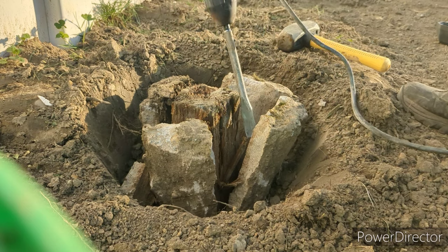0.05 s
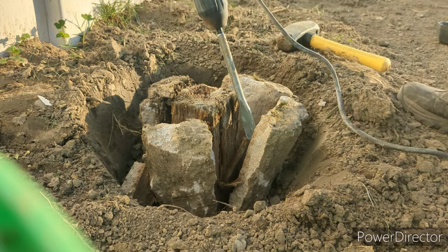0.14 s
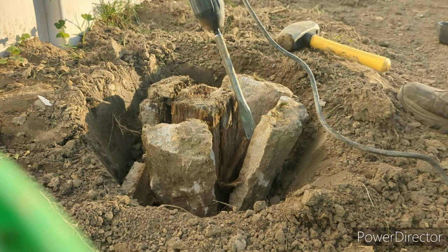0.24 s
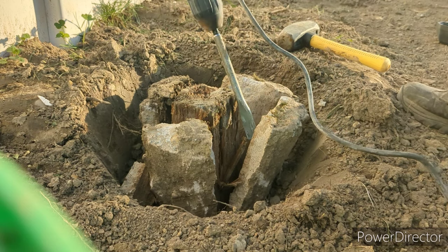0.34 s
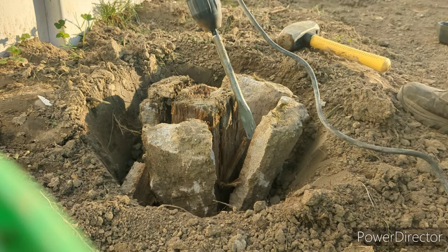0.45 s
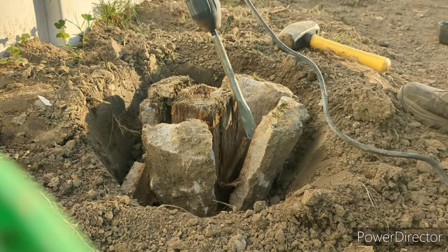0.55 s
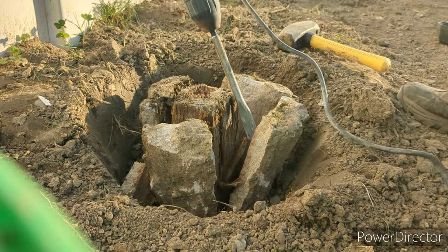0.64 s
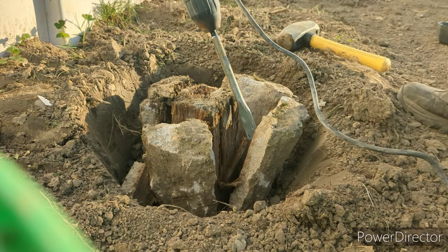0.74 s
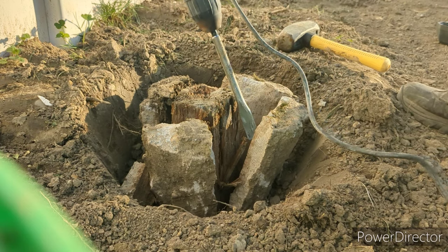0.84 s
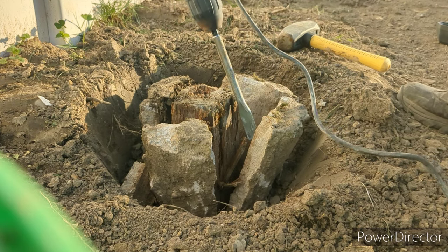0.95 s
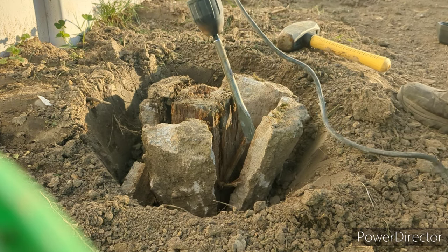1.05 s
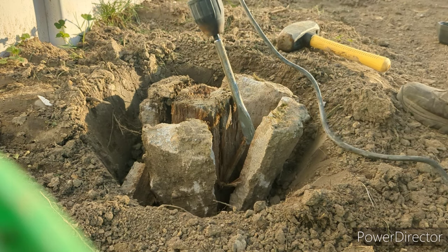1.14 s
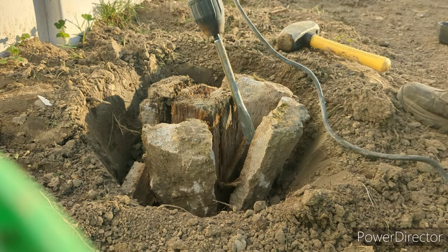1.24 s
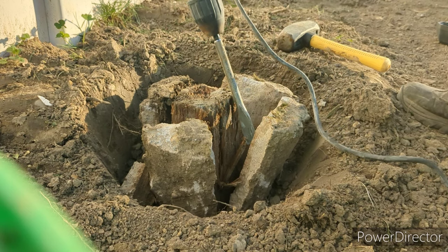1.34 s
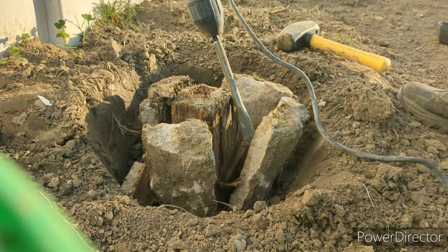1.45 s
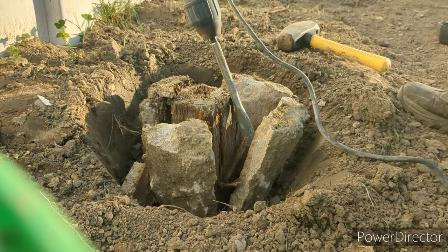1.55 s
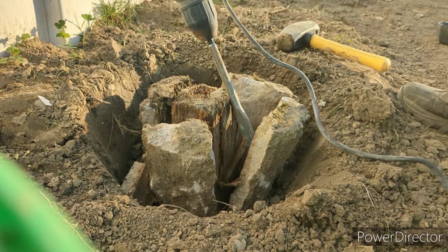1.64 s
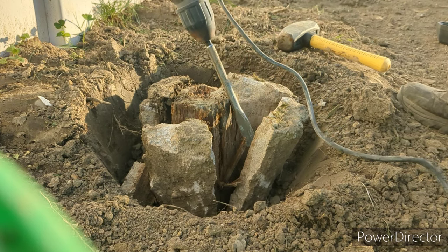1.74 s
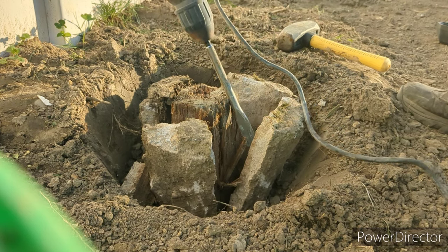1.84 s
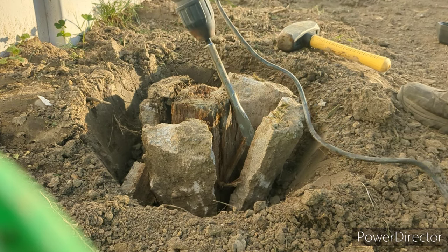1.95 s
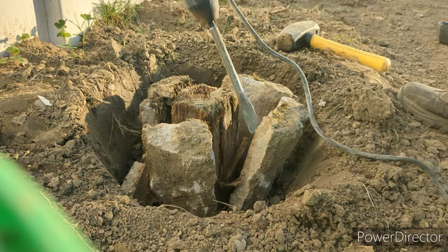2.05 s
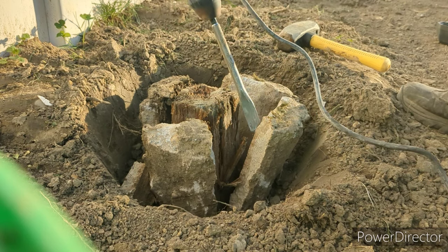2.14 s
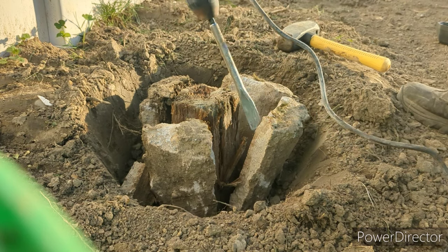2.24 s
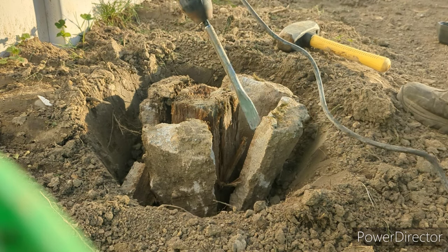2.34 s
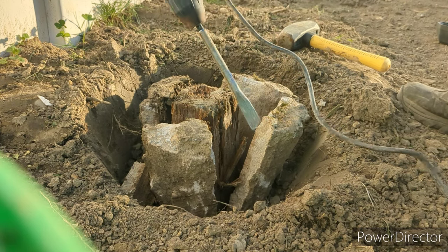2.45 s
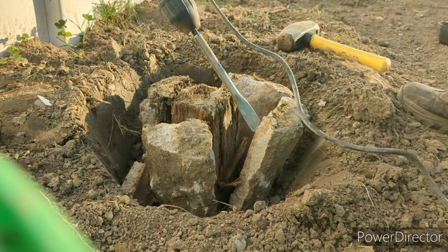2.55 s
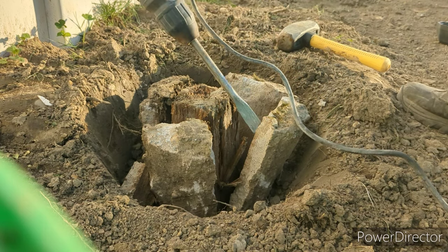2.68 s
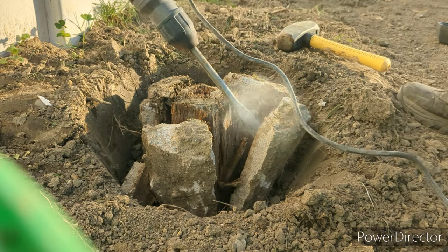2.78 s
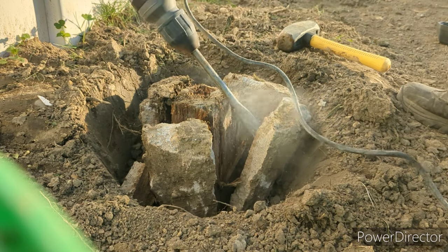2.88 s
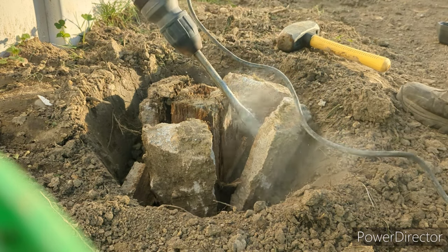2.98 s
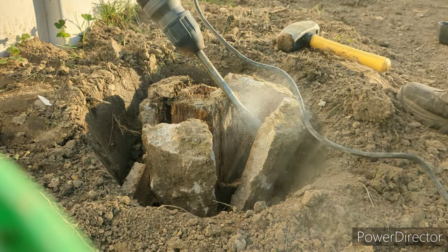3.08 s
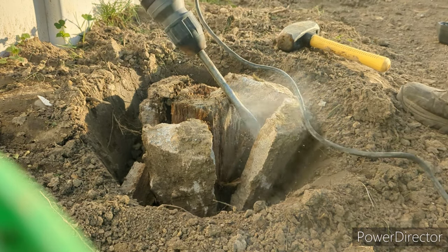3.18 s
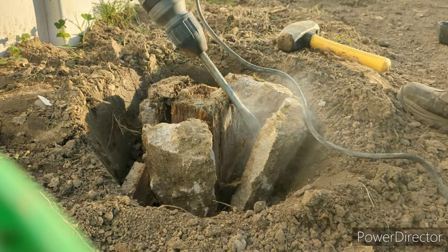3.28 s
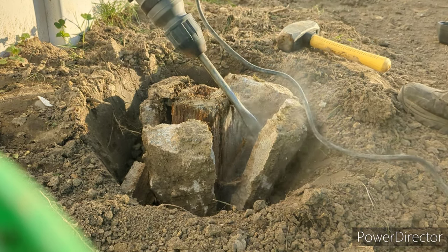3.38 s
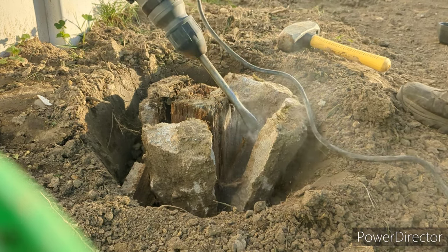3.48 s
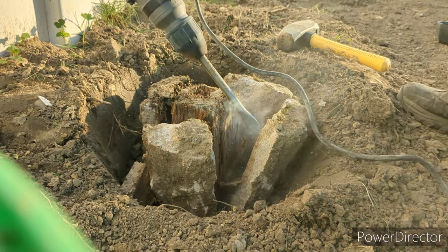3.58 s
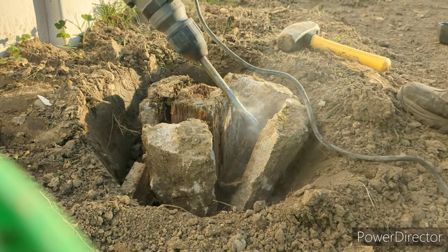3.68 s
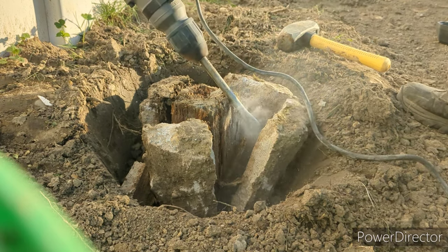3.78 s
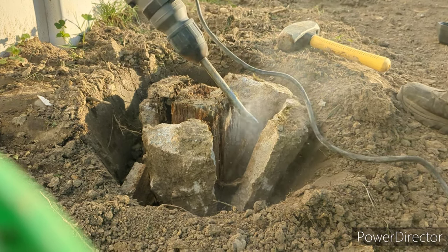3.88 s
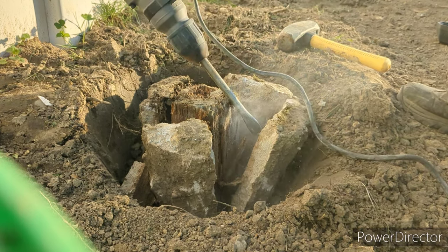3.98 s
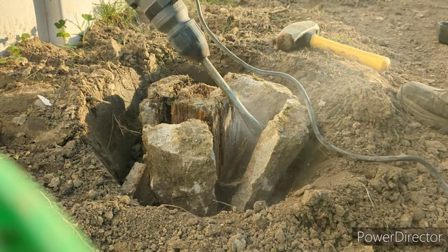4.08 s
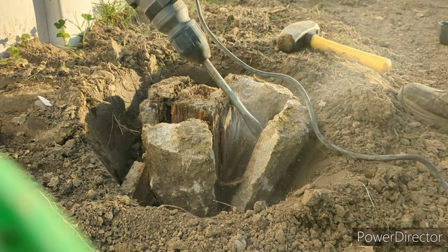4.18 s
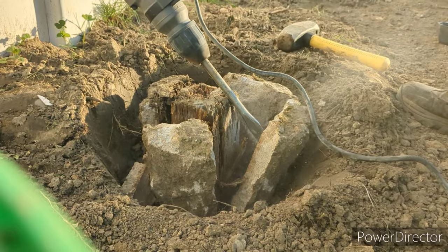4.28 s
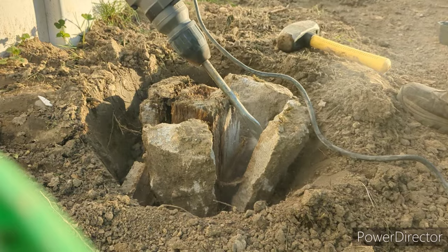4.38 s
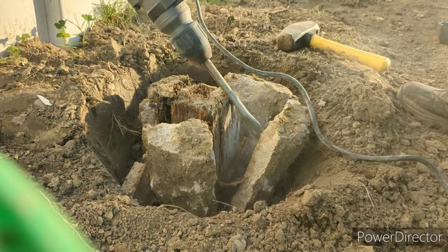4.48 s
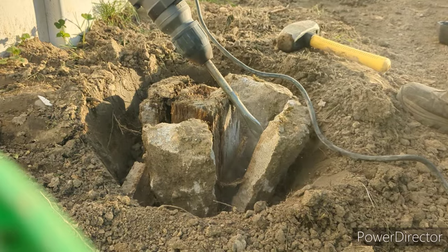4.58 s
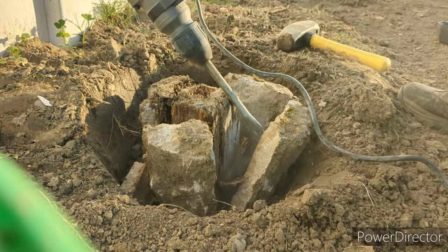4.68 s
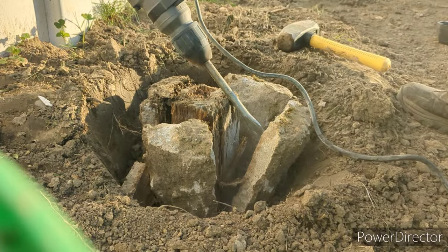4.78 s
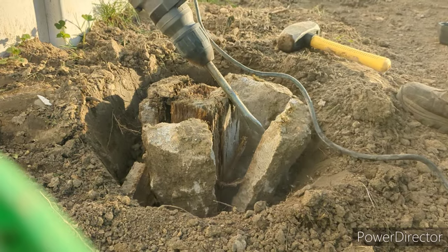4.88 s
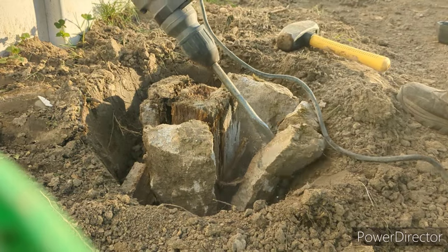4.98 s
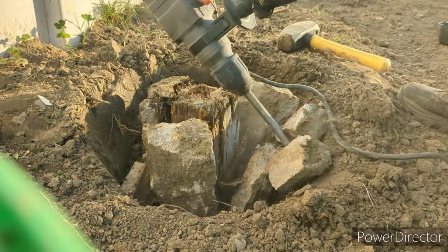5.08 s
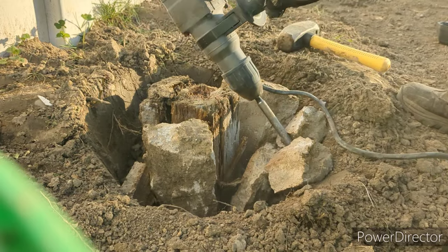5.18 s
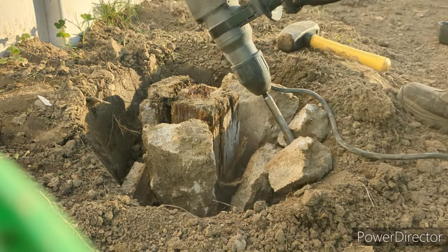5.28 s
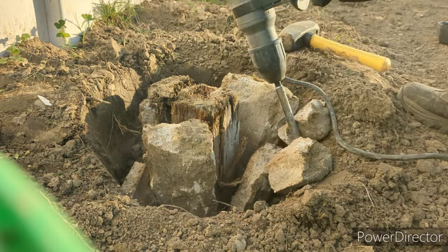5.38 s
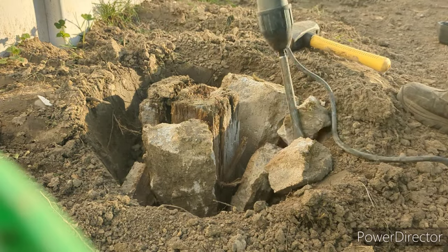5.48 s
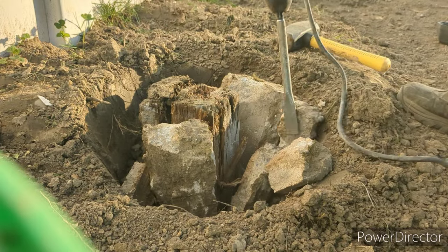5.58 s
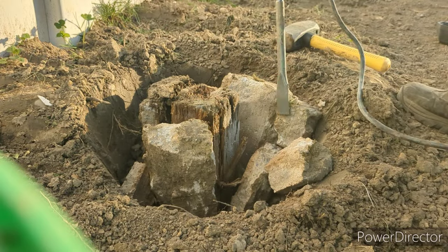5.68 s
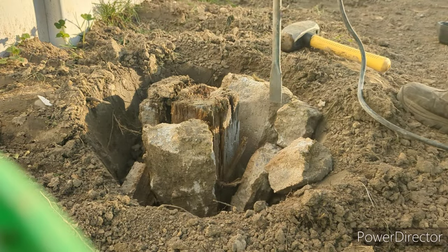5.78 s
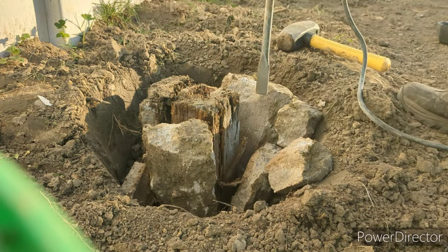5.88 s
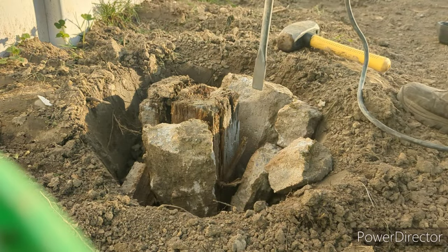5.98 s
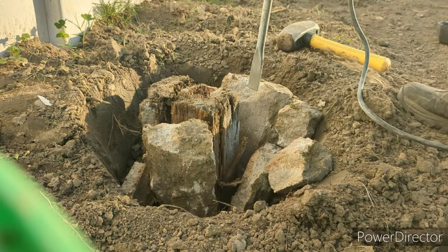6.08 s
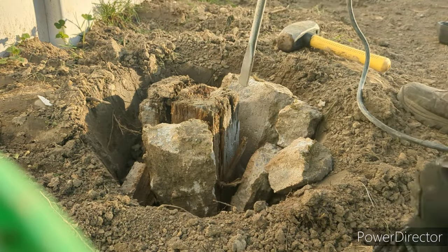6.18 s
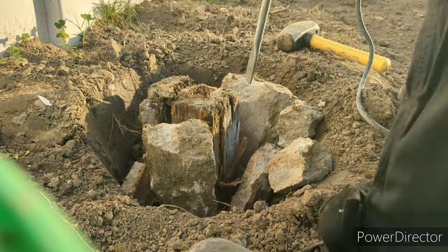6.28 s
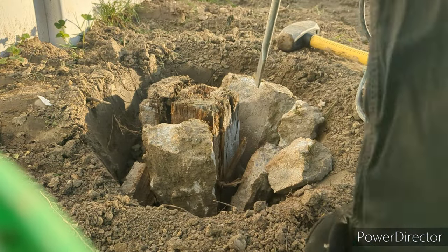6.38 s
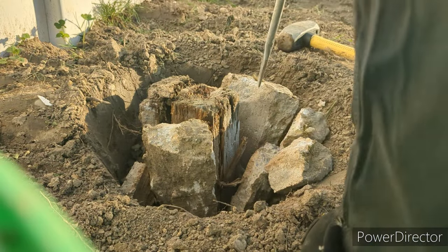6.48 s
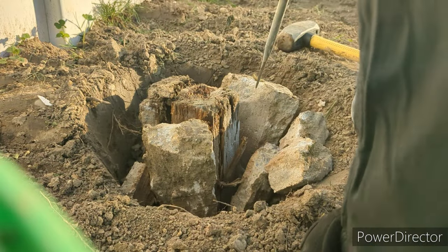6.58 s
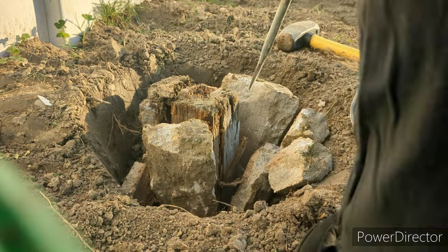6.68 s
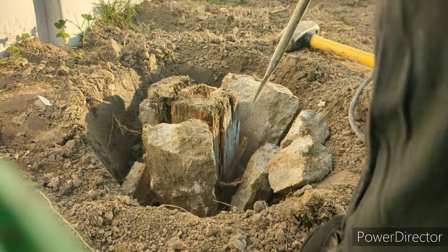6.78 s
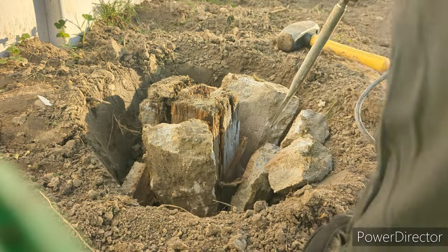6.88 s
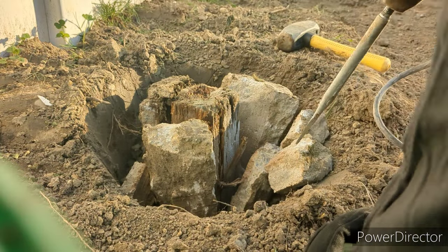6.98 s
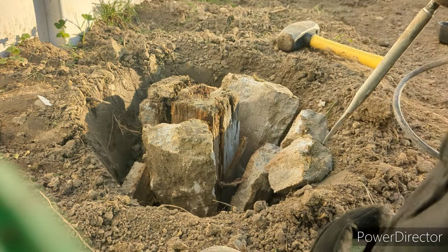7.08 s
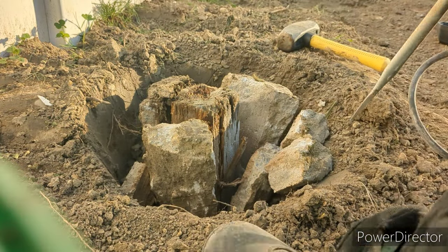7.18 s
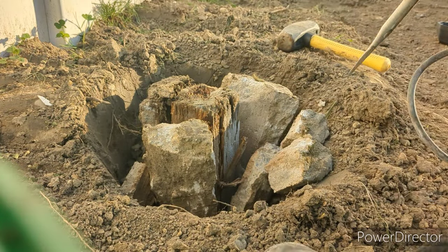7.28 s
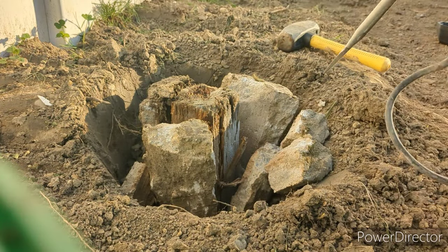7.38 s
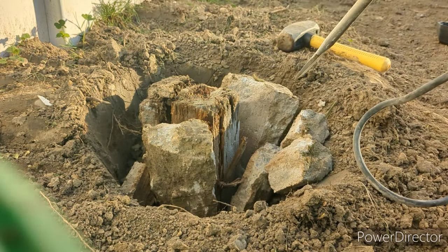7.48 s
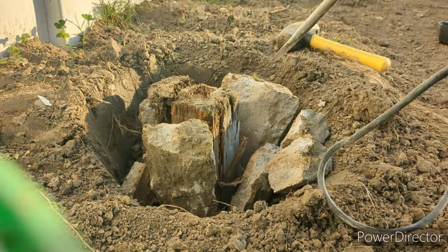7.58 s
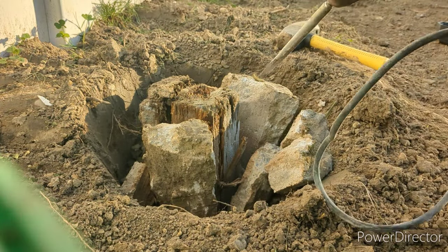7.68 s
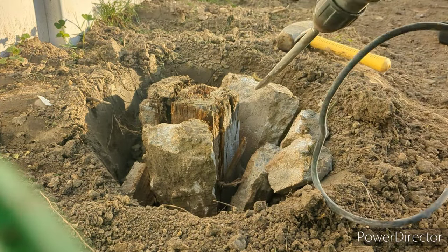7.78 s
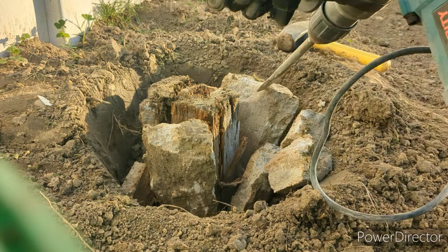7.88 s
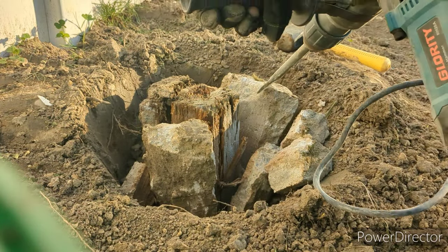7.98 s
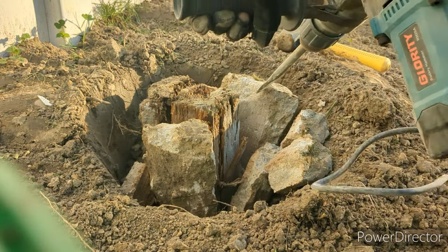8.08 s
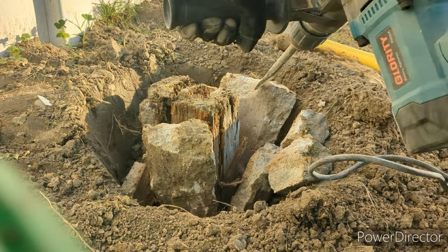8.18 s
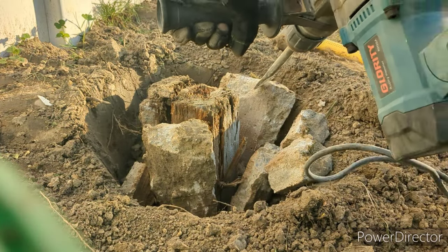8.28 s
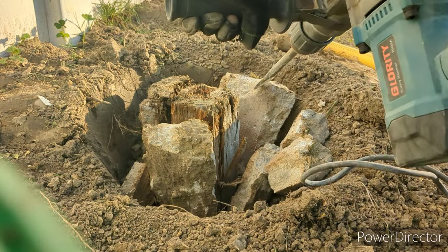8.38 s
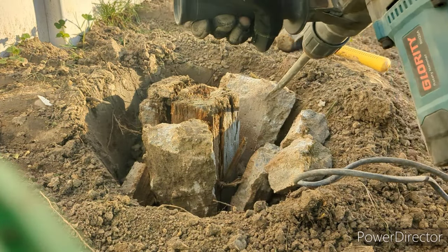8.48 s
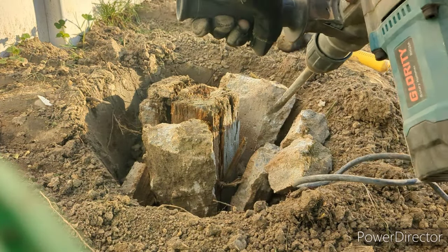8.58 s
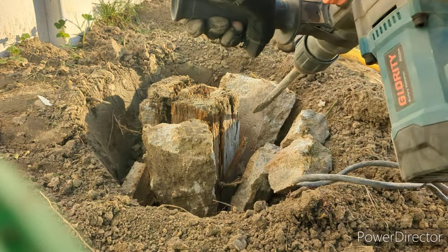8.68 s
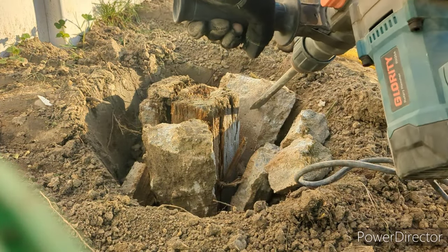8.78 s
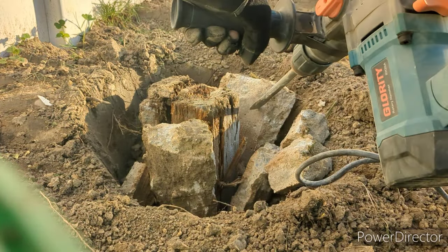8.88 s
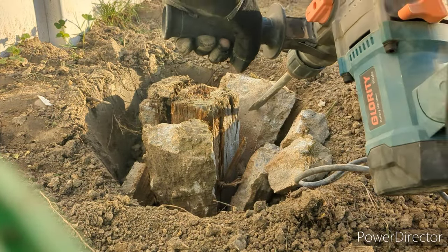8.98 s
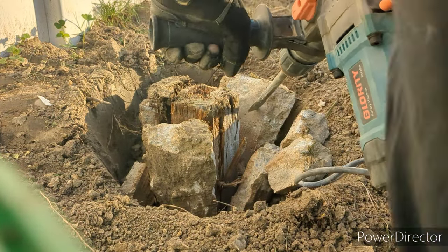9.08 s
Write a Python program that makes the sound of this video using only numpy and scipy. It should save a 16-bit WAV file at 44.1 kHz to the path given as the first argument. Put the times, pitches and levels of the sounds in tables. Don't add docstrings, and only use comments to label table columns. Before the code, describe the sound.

Outdoors, a power tool's motor whirrs up, its chisel hammers a concrete block until lumps break off, then it coasts down with gear ticks.

```python
import sys
import numpy as np
from scipy import signal
from scipy.fft import rfft, irfft, next_fast_len
from scipy.io import wavfile

SR = 44100
rng = np.random.default_rng(int(sys.argv[2]) if len(sys.argv) > 2 else 0)


def transcribe(u):
    v = np.clip(np.atleast_2d(u).T, -1, 1)
    q = np.round(v * 32767).astype(np.int16)
    wavfile.write(sys.argv[1], SR, q)


def rack_gain(trim_db):
    fader = np.asarray(trim_db, float)
    return 10 ** (fader / 20)


N = 403074

# frequency in Hz, level in dB per Hz.
AIR = [(15, -56.5), (25, -27.5), (55, -6.5), (96, -2.5), (184, -9.5), (260, -6.5), (617, -11.5),
       (1380, -22.5), (2020, -28), (2370, -25), (4180, -26), (4910, -30), (15600, -30.5)]
# frequency in Hz, level in dB rms.
FAR_TONES = [(2030, -73), (4059, -87)]
# time in seconds, level in dB.
GUSTS = [(0, -49), (.3, -59.5), (.7, -50.5), (1.3, -52), (1.8, -53), (2.3, -58.5), (2.8, -60.5), (3.6, -47),
         (4.4, -60.5), (5.2, -64.5), (5.8, -80), (6.5, -65), (7.6, -59), (9.14, -68.5)]
# frequency in Hz, shared part from 0 to 1.
LIKENESS = [(100, 1), (300, 0.95), (700, 0.65), (1200, 0.84), (3000, 0.35), (8000, 0.16), (15000, 0.2)]
# centre in Hz, width in Hz, boost in dB.
PORT_COLOUR = [(5480, 450, -3.5), (2910, 220, -3.5), (8180, 560, -1.5), (14200, 600, 1)]

# start in seconds, peak in dB, ring in dB, length in seconds.
CLINKS = [(7.997, -20, -48, 0.0033), (8.007, -33, -60, 0.0064), (8.021, -30.5, -61, 0.011),
          (8.087, -28, -46, 0.005), (8.198, -32, -52, 0.0049), (8.242, -24, -62, 0.003),
          (8.261, -26, -63, 0.0044), (8.29, -31, -65, 0.005), (8.333, -38, -69, 0.004),
          (8.518, -28, -46, 0.0045), (8.541, -33, -44, 0.0078), (8.831, -35, -66, 0.005),
          (8.847, -32, -65, 0.003), (8.992, -30.5, -48, 0.0041)]
# frequency in Hz, level in dB, t60 in seconds.
SHANK = [(694, 4.5, 0.036), (1480, -21, .02), (1990, -24, .03), (3150, 6, 0.033), (4100, -3, 0.018),
         (6840, -6, 0.034), (10500, -2, .03)]
# time in seconds, level in dB.
RUSTLE = [(0, -99), (8.2, -77.5), (8.27, -56), (8.35, -58), (8.4, -74), (8.95, -83), (9.04, -60),
          (9.14, -57)]
# start in seconds, level in dB.
RUBBLE = [
    (5.15, -42.5),
    (5.172, -37),
    (5.189, -37.5),
    (5.235, -41),
    (5.288, -49),
    (5.329, -43.5),
]
# frequency in Hz, level in dB, t60 in seconds.
LUMPS = [(137, -13, 0.12), (180, 3, 0.039), (300, -9, 0.047), (720, 2.5, 0.045), (1120, 8.5, 0.042)]

# time in seconds, pitch in Hz, level in dB.
SQUEAL = [(6.9, 2140, -51), (7.15, 1984, -44), (7.3, 2060, -49), (7.5, 2114, -48), (7.65, 2020, -48),
          (7.8, 2080, -54), (7.9, 2140, -52), (7.95, 2110, -80)]
# time in seconds, pitch in Hz, level in dB.
VENT = [(6.4, 10500, -70), (6.8, 10500, -58), (7.1, 9350, -45), (7.34, 9100, -48.5), (7.4, 10200, -52),
        (7.55, 10300, -53), (7.62, 9350, -56), (7.95, 9300, -78)]
# time in seconds, pitch in Hz, level in dB.
PULL_AWAY = [(.385, 2400, -55), (.41, 2480, -39), (.46, 2650, -38), (.49, 2800, -55)]
# time in seconds, pitch in Hz, level in dB.
LEAN = [(2.5, 1050, -53), (2.6, 1116, -35.5), (2.72, 1150, -43.5), (2.8, 1250, -24.5), (2.82, 1200, -47)]
# start in seconds, level in dB.
TEETH = [(6.4, -24), (6.455, -17), (6.485, -24), (6.541, -19), (6.57, -22), (7.0345, -29.5), (7.2346, -34),
         (7.47, -30), (7.551, -32), (7.6, -41), (7.6665, -37), (7.71, -42), (7.737, -40), (7.765, -39),
         (7.955, -48)]
# centre in seconds, peak in dB, push 1 or pull -1, length in seconds.
PUFFS = [(0.291, -26, -1, .0032), (0.2976, -21, -1, .0032), (0.3035, -23, -1, .0032), (0.72, -24, 1, .003),
         (0.768, -24, 1, .003), (1.084, -25, -1, .003), (2.8258, -17, -1, .002), (2.8662, -8.5, 1, .002),
         (2.88, -18, -1, .0016), (3.0712, -9, -1, .002), (3.0856, -17, -1, .002), (3.1006, -8.5, -1, .002),
         (3.1157, -7.5, 1, .002), (3.1463, -13, -1, .002), (3.4651, -6.5, 1, .002), (4.469, -24, 1, .003)]

# time in seconds, speed in turns per second.
SPEED = [(0, 225), (.38, 165), (.5, 284), (.57, 314), (.72, 354), (.97, 383), (1.4, 394), (2.8, 396),
         (3.2, 338), (5.15, 339), (5.35, 350), (5.55, 378), (5.72, 383), (6.1, 263), (6.34, 214),
         (6.74, 148), (7.2, 92), (7.95, 25)]
# time in seconds, #
# level in dB.
DRIVE = [(0, -3), (.38, -0.7), (.45, 1), (.55, 3.5), (.75, 3.5), (1.05, 1.47), (2.8, 0.78), (2.825, -10.5),
         (3.05, -8.5), (4.0, -8), (5.29, -7.5), (5.33, -2), (5.62, 0.5), (6.2, -4), (7.0, -1.5),
         (7.97, -2.5), (8.05, -20)]
# time in seconds, left lag in samples, left minus right in dB.
PLACE = [(0, 0, 0), (.75, -1, 0.4), (2.75, -1.5, 0), (3, 2.5, -0.5), (4.8, 5.5, -4), (5.3, 1.5, -1.5),
         (5.8, 7.5, 0), (6.3, 4, 0.5), (6.8, 4, -0.5), (7.3, 22.5, -1), (7.8, 15.5, -3), (9.2, 13, 0)]
# speed in turns per second, housing in dB, gears in dB, fan in dB.
ROAR_LAW = [(25, -50.5, -60.5, -57.5), (56.6, -47, -50.5, -48.5), (86, -43.5, -49.5, -45),
            (132, -36.5, -43.5, -37), (240, -32, -28.5, -30.5), (308, -29, -25.5, -27.5),
            (401, -26.5, -21, -23)]
# frequency in Hz, level in dB per Hz.
ROAR = [(88, -44), (150, -30), (353, -15), (389, -11), (472, -10), (710, -2.5), (1030, -6), (1350, 0.5),
        (1610, -1.5), (4330, -7), (5470, -8.5), (7320, -2), (9070, 7), (11200, 17.5), (15600, 3)]
# centre in Hz, width in Hz, boost in dB.
HOUSING = [(726, 78, 2.5), (1270, 130, 0.5), (1972, 19, 8), (4660, 170, 1), (10960, 750, -0.5)]
# frequency in Hz, level in dB per Hz.
IDLE_ROAR = [(120, -51), (200, -70), (299, -13.5), (454, -11), (566, -7), (704, -0.5), (892, -10.5),
             (1030, -7), (1540, -8), (2030, -4), (2430, -5), (6760, -15.5), (7960, -26.5), (9730, -17),
             (15600, -41)]
# centre in Hz, width in Hz, boost in dB.
IDLE_HOUSING = [(686, 380, 6), (1200, 370, 2), (2110, 36, 8.5), (9100, 900, -3.5)]
# centre in seconds, swell in dB, half length in seconds.
JOLTS = [(1.43, -2, 0.13), (1.47, 4, 0.021), (1.94, -2, 0.043), (2.64, 4, 0.088), (2.68, -4, 0.062),
         (2.97, 7.5, 0.034), (3.0, 10, 0.0048), (7.41, 4, 0.015), (7.5, 4, 0.02), (7.61, 2.5, 0.024),
         (7.7, 4.5, 0.036), (7.84, 1.5, .04)]
# frequency in Hz, level in dB.
WHINE = [(1300, -75), (1950, -44), (2300, -54), (2650, -56), (2900, -40), (3200, -38), (3550, -52),
         (4100, -38), (4400, -41), (4750, -31), (5000, -32), (7500, -31)]
# start in seconds, end in seconds, change in dB.
WHINE_SHADED = [
    (0, .46, -6),
    (.46, .6, -4),
    (.6, 1.0, 1),
    (2.81, 5.17, -14),
    (5.17, 5.45, -3),
    (5.45, 6.1, -11),
]
# centre in Hz, width in Hz, boost in dB.
PINION_MODES = [(3200, 350, 25), (2150, 300, 22)]
# centre in seconds, swell in dB, half length in seconds.
OCTAVE_SWELL = [(.72, 9, .22)]
# centre in seconds, swell in dB, half length in seconds.
CRANK_SWELL = [(1.12, 7, .1)]
# time in seconds, level in dB.
DRONE = [(0, -39), (.17, -44), (.3, -61), (.32, -99), (5.68, -99), (5.7, -56), (6.0, -43), (6.5, -38.5),
         (7.0, -43), (7.3, -67)]

# time in seconds, stroke number.
STROKES = [(2.812, 1), (2.8255, 2), (2.852, 4), (2.866, 5), (2.894, 7), (2.909, 8), (2.9245, 9),
           (2.9405, 10), (2.9555, 11), (2.97, 12), (3.0846, 20), (3.1919, 27), (3.3029, 34), (3.4155, 41),
           (3.5289, 48), (3.6419, 55), (3.7549, 62), (3.8677, 69), (3.9805, 76), (4.0933, 83), (4.2058, 90),
           (4.3185, 97), (4.431, 104), (4.5435, 111), (4.6561, 118), (4.7687, 125), (4.8808, 132),
           (4.9918, 139), (5.1034, 146), (5.216, 153), (5.2956, 158)]
# time in seconds, force in dB, chuck slack in dB, blade ring in dB, shoulder ring in dB.
BLOWS = [(2.812, -29, -2.5, -11, -11), (2.925, -22, 1, -1.5, -3.5), (3.042, -27, -6.5, -3.5, 1.5),
         (3.17, -24, 0, 3.5, -8), (3.287, -24, -8, -6.5, -5.5), (3.416, -26.5, 1.5, 1.5, 0.5),
         (3.545, -26, -2, -1.5, 4), (3.674, -23, -8.5, -5.5, -6.5), (3.803, -22, -6, -5.5, -0.5),
         (3.932, -24, -5, -5.5, 1), (4.061, -23, -3, -10, 3.5), (4.19, -24.5, -2.5, -4, 1),
         (4.319, -22.5, -8.5, -8, -1.5), (4.447, -25.5, 1, 7, 2.5), (4.576, -25.5, 3.5, 6.5, 0),
         (4.704, -20.5, -2.5, -1, -2.5), (4.833, -23, -3.5, -3, -11), (4.96, -25.5, 1.5, 0, -5.5),
         (5.087, -28, 6, 3, 3.5), (5.119, -26, 9.5, 4, -3), (5.168, -27, 12, 7.5, -1),
         (5.216, -28, 10, 1, -4), (5.296, -28, 10, -1, -3)]
# stroke number, change in dB.
ACCENTS = [(1, 6.5), (2, 8.5), (3, -3), (4, 3.5), (5, -5.5), (8, 1.5), (18, 3.5), (20, 3.5), (25, -4.5),
           (31, -4.5), (37, -2.5), (42, 2.5), (44, -4), (47, -3.5), (51, 0.5), (52, 1), (58, 2.5), (62, 1),
           (63, -0.5), (71, -4.5), (73, 0), (80, 0.5), (85, -6.5), (86, 0.5), (88, 0.5), (89, 2), (90, 2),
           (97, -5.5), (100, -1.5), (102, 1.5), (107, 0), (111, -6), (112, -1.5), (114, -2.5), (116, -1.5),
           (119, -0.5), (120, -1.5), (121, -2.5), (122, -3), (123, -2), (125, 3.5), (128, 0), (131, 2),
           (134, -3), (136, 3), (139, 1), (144, -2.5), (145, 6.5), (150, -1), (152, -1.5), (153, -6),
           (154, -1.5), (155, -10), (156, -2)]
# time in seconds, base in dB, lower in dB, middle in dB, edge in dB.
FOOTING = [(3.17, -1, -7, -1, 0), (3.287, -12.5, -4, 7.5, 1), (3.416, -16, 4, 6, -1),
           (3.545, -1.5, -4.5, 7.5, -10), (3.674, 0.5, -12, 1.5, -3), (3.803, -6, -5, 2.5, 2),
           (3.932, -1.5, 6, 3, -9), (4.061, -4, -3, 0.5, 1), (4.19, -2, -1, 5, -4),
           (4.319, -10, -6.5, 1, 4.5), (4.447, 4, 7.5, 1.5, 2), (4.576, 7, -4, 6, 3),
           (4.704, 1, -1, 3, -11.5), (4.833, -0.5, -6.5, 0.5, 5.5), (4.9, -7, -19, 5, 7.5),
           (4.96, 7.5, -2, 4.5, 7), (5.03, 6, 3, 12.5, 12.5), (5.087, 8.5, -2, 7.5, 6),
           (5.119, 2, 0, 5, -1), (5.155, 3, 1, -0.5, -12)]
# frequency in Hz, level in dB, t60 in seconds.
BIT = [(3640, -28, 0.015), (4520, -5, 0.014), (6450, -12, 0.036), (6900, -3, 0.012), (7600, -0.5, .003),
       (9180, -11, 0.016), (10200, 14, 0.004)]
# frequency in Hz, level in dB, t60 in seconds.
CHUCK = [(12100, 1, 0.025), (12620, 7, 0.022), (12750, 3, 0.005)]
# frequency in Hz, level in dB, t60 in seconds.
BLADE = [(10140, 6, 0.037), (10050, -3.5, 0.0067)]
# frequency in Hz, level in dB, t60 in seconds.
SHOULDER = [(10560, 10.5, 0.0059), (11000, 5.5, 0.016)]
# frequency in Hz, level in dB, t60 in seconds.
CONCRETE = [(126, -24, 0.016), (280, -19.5, 0.055), (294, -6, 0.055), (550, -11, 0.025), (677, -2, 0.066),
            (800, -7.5, 0.026), (909, -2, 0.032), (1050, -3, 0.083), (1410, -5.5, 0.023),
            (1560, -4.5, 0.028), (1680, -10.5, .016)]


def rms_one(x):
    return x / np.sqrt(np.mean(x ** 2) + 1e-20)


def in_time(rows):
    s, *columns = np.transpose(rows)
    return [np.interp(np.arange(N) / SR, s, c) for c in columns]


def at_hz(points, hz):
    return np.interp(np.log(hz), np.log(np.array(points)[:, 0]), np.array(points)[:, 1])


def peaks(modes, hz):
    return sum(db / (1 + (2 * (hz - f) / width) ** 2) for f, width, db in modes)


def bumps(rows):
    return sum(db * np.exp(-((np.arange(N) / SR - s) / half) ** 2) for s, db, half in rows)


def drift(rate):
    r = np.exp(-2 * np.pi * rate / SR)
    return rms_one(signal.lfilter([1], [1, -2 * r, r * r], rng.standard_normal(N + SR))[SR:])


def filtered(x, order, hz, kind):
    return signal.sosfilt(signal.butter(order, hz, kind, fs=SR, output="sos"), x)


def shaped(x, gain_at):
    size = next_fast_len(N)
    return irfft(rfft(x, size) * gain_at(np.arange(1, size // 2 + 2) * SR / size), size)[..., :N]


def late(x, samples):
    return np.interp(np.arange(N) - samples, np.arange(N), x)


def stereo_noise(lag, grain_db):
    white = rng.standard_normal((4, N)) * rack_gain(grain_db * drift(680))
    left = late(white[0], np.round(lag)) + 0.86 * white[1]
    right = white[0] + 1.18 * late(white[1], 10.5)
    shared = np.array([left, right]) / 1.23
    alike = shaped(shared, lambda hz: np.sqrt(np.clip(at_hz(LIKENESS, hz), 0, 1)))
    own = shaped(white[2:], lambda hz: np.sqrt(np.clip(1 - at_hz(LIKENESS, hz), 0, 1)))
    return alike + own


def strike(at, db, modes, spread_db):
    out, heard = np.zeros((2, N)), slice(at.min(), at.max() + SR // 4)
    for hz, level_db, t60 in modes:
        clicks = np.full((2, N), 1e-18)
        clicks[:, at] = rack_gain(db + level_db + spread_db * rng.standard_normal((len(at), 2)).T)
        r, w = rack_gain(-60 / (t60 * SR)), 2 * np.pi * hz / SR
        out[:, heard] += signal.lfilter([0, np.sin(w)], [1, -2 * r * np.cos(w), r * r], clicks[:, heard])
    return out


def crack(at, db, decay_s):
    clicks = np.full(N, 1e-18)
    clicks[at] = rack_gain(db)
    return signal.lfilter([1], [1, -np.exp(-1 / (decay_s * SR))], clicks) * rng.standard_normal((2, N))


def singing(rows, width_hz, flutter_db):
    hz, db = in_time(rows)
    t = np.arange(N) / SR
    slow = filtered(rng.standard_normal((2, 2, N)), 2, width_hz / 2, "low")
    angle = 2 * np.pi * np.cumsum(hz) / SR
    band = rms_one(slow[0] * np.sin(angle) + slow[1] * np.cos(angle))
    sounding = (t > rows[0][0]) * (t < rows[-1][0])
    return rack_gain(db + flutter_db * drift(25)) * sounding * (band + .5 * band[::-1])


def outdoors():
    air = rms_one(shaped(stereo_noise(8, grain_db=2.5), lambda hz: rack_gain(at_hz(AIR, hz))))
    air = rack_gain(-52.5 + 1.1 * drift(4.9)) * air
    t = np.arange(N) / SR
    tones = sum(rack_gain(db + 5 + 1.2 * drift(6)) * np.sin(2 * np.pi * hz * t) for hz, db in FAR_TONES)
    wind = rms_one(filtered(rng.standard_normal((2, N)), 2, [50, 220], "band"))
    gust_db = in_time(GUSTS)[0] + 6 * drift(8.8)
    return air + tones + rack_gain(gust_db) * wind * rack_gain(np.array([[-4.5], [0]]))


def clinks():
    out, t = np.zeros((2, N + SR)), np.arange(SR // 10) / SR
    for s, db, ring_db, length_s in CLINKS:
        shape = (1 - np.exp(-t / 0.00052)) * np.exp(-t / max(2.4 * length_s, .002))
        scrape = rack_gain(db - 9.5) * shape * rng.standard_normal((2, len(t)))
        knock = filtered(scrape, 1, [450, 2200], "band")
        out[:, int(s * SR):int(s * SR) + len(t)] += 0.38 * scrape + 1.25 * knock
    grit = rms_one(filtered(rng.standard_normal((2, N)), 2, [7500, 13000], "band"))
    grit = rack_gain(in_time(RUSTLE)[0] + 2.5 * drift(60)) * grit
    s, peak_db, ring_db, _ = np.transpose(CLINKS)
    at = (s * SR).astype(int) + 40
    body = strike(at + 60, peak_db - 19.5, SHANK[:2], 3.3)
    ring = strike(at, ring_db - 1.5, SHANK[2:], 3.6)
    return out[:, :N] + grit + body + ring


def rubble():
    s, db = np.transpose(RUBBLE)
    return strike((s * SR).astype(int), db, LUMPS, 7.0)


def gear_noises():
    s, db = np.transpose(TEETH)
    ticks = filtered(crack((s * SR).astype(int), db, .003), 2, 1800, "high")
    squeal = singing(SQUEAL, 350, flutter_db=4.0)
    pull_away = singing(PULL_AWAY, 90, flutter_db=3.0)
    hiss = singing(VENT, 1300, flutter_db=2.5)
    groan = singing(LEAN, 450, flutter_db=2.5)
    return squeal + pull_away + hiss + groan + ticks


def puffs():
    out = np.zeros(N)
    for s, db, sign, length_s in PUFFS:
        push = np.bartlett(int(length_s * SR)) ** 2.5
        out[int(s * SR) - len(push) // 2:][:len(push)] += sign * rack_gain(db + 3.5) * push
    leaked = filtered(out + 1e-18, 2, 65, "high")
    return leaked * rack_gain(np.array([[-26], [0]]))


def roar(noise, turns, throb, levels_db):
    casing_db = 1.5 * rng.standard_normal(200)
    ripple = lambda hz: np.interp(hz, np.arange(200) * 80, casing_db) * np.clip(hz / 3000, .2, 1)
    low = lambda hz, edge_hz: 1 / (1 + (hz / edge_hz) ** 8)
    parts = [lambda hz: low(hz, 3130), lambda hz: low(hz, 6890) - low(hz, 2915), lambda hz: 1 - low(hz, 7900)]
    fast = np.clip((turns - 130) / 170, 0, 1)
    together, out = 0.87 * drift(8.8), 0
    for db, part, throb_share in zip(levels_db, parts, (.4, .8, 1.2)):
        def coloured(spectrum, modes):
            colour = lambda hz: part(hz) * rack_gain(at_hz(spectrum, hz) + ripple(hz) + peaks(modes, hz))
            return rms_one(shaped(noise, colour))
        mixed = fast * coloured(ROAR, HOUSING) + (1 - fast) * coloured(IDLE_ROAR, IDLE_HOUSING)
        out = out + rack_gain(db + 4.0 + throb_share * throb + together + 0.65 * drift(38)) * mixed
    return out


def slot_whine(turns, angle):
    slots, mesh, pinion = 19, 21.5, 14.6
    t = np.arange(N) / SR
    shade_db = sum(db * (t > start) * (t < end) for start, end, db in WHINE_SHADED)
    whine_db = at_hz(WHINE, slots * turns) + shade_db + 1 + 2.5 * drift(40) + 1.2 * drift(8)
    whine = rack_gain(whine_db) * (np.sin(slots * angle) + .3 * np.sin(mesh * angle))
    pinion_db = -62 + peaks(PINION_MODES, pinion * turns) + 3 * drift(30)
    return whine + rack_gain(pinion_db) * (t > 6.2) * np.sin(pinion * angle)


def unbalance(turns, angle, crank_angle, drive_db, housing_db):
    lifted_db = 3.5 * (np.arange(N) / SR > 5.3)
    shake = rack_gain(housing_db - 16 + lifted_db + 1.5 * drift(8)) * np.clip(turns / 395, 0, 1) ** 1.9
    octave_db = -2 + 1.6 * np.maximum(drive_db, 0) + bumps(OCTAVE_SWELL)
    out = shake * (np.sin(angle) + rack_gain(octave_db) * np.sin(2 * angle))
    for order in (8, 10):
        overtone_db = housing_db - 12 + (order == 10) * bumps(CRANK_SWELL) + 2 * drift(3)
        out += rack_gain(overtone_db) * np.clip((turns - 365) / 20, 0, 1) * np.sin(order * crank_angle)
    return out


def case_drone(noise, throb):
    centre_hz, width_hz = 1306, 320
    case = filtered(noise, 2, [centre_hz - width_hz / 2, centre_hz + width_hz / 2], "band")
    drone_db = np.interp(np.arange(N) / SR, *np.transpose(DRONE), left=-120, right=-120)
    return rack_gain(drone_db + throb) * rms_one(case)


def motor():
    turns, drive_db, t = in_time(SPEED)[0], in_time(DRIVE)[0], np.arange(N) / SR
    angle = 2 * np.pi * np.cumsum(turns * (1 + .001 * drift(8.7) + .0035 * drift(45) * (t > 6))) / SR
    crank_angle = angle / 5.42
    crank = np.cos(crank_angle) + .5 * np.cos(2 * crank_angle - 1)
    knock_db = 1.27 + bumps([(6.52, 2.1, 0.058)])
    throb = knock_db * crank * (1 + .5 * drift(1.2)) + 1.5 * np.cos(angle)
    lag, pan_db = in_time(PLACE)
    noise = stereo_noise(lag, grain_db=1.5)
    speeds, *laws = np.transpose(ROAR_LAW)
    jolt_db = bumps(JOLTS)
    drive_shares = (0.86, 1.07, 1.04)
    levels_db = [np.interp(turns, speeds, law) + share * drive_db + jolt_db
                 for law, share in zip(laws, drive_shares)]
    out = roar(noise, turns, throb, levels_db) + case_drone(noise, throb)
    out = out + slot_whine(turns, angle) + unbalance(turns, angle, crank_angle, drive_db, levels_db[0])
    return out * rack_gain(pan_db * np.array([[.5], [-.5]]))


def steel(at, luck, bit_db):
    slack_db, blade_db, shoulder_db = (c[at] for c in in_time(BLOWS)[1:])
    again = at + (SR * (.0016 + 0.00027 * np.clip(luck[:, 1], -2, 2))).astype(int)
    later = at + (SR * .0042 * np.exp(0.21 * luck[:, 5])).astype(int)
    contacts = [(at - 28, -11 + 3 * luck[:, 4], .0006),   # sample, dB, grit decay in seconds
                (at, 0, .0007),
                (again, -7 + 2 * luck[:, 3], .0022),
                (later, -13 + 2.5 * luck[:, 6], .003)]
    ring, grit = 0, 0
    for when, db, decay_s in contacts:
        hit_db = bit_db + db
        ring = ring + strike(when, hit_db + 0.5, BIT, 2.5)
        ring = ring + strike(when, hit_db + slack_db - .5, CHUCK, 2.7)
        ring = ring + strike(when, hit_db + blade_db, BLADE, 2.5)
        ring = ring + strike(when, hit_db + shoulder_db, SHOULDER, 2.5)
        grit = grit + crack(when, hit_db + 16.5, decay_s)
    grit = grit + rack_gain(-10) * filtered(grit, 1, [2000, 5000], "band")
    return filtered(ring + grit, 2, 1300, "high")


def concrete(at, luck, thud_db):
    base_db, lower_db, middle_db, edge_db = (c[at] for c in in_time(FOOTING))
    thud = strike(at + 35, thud_db + base_db + 1.5, CONCRETE[:3], 1.3)
    thud += strike(at + 35, thud_db + lower_db + 3, CONCRETE[3:5], 1.3)
    thud += strike(at + 35, thud_db + middle_db + 3, CONCRETE[5:8], 1.3)
    thud += strike(at + 35, thud_db + edge_db + 4, CONCRETE[8:], 1.3)
    settle_db = thud_db + middle_db - .5 + 1.2 * luck[:, 3]
    thud += strike(at + int(.0022 * SR), settle_db, CONCRETE[5:8], 1.1)
    return filtered(thud, 8, 112, "high")


def hammer():
    s, number = np.transpose(STROKES)
    luck = rng.standard_normal((158, 7))
    beat = (np.interp(np.arange(1, 159), number, s) * SR).astype(int)
    at = beat + (.0001 * SR * luck[:, 0]).astype(int)
    t = at / SR
    force_db = in_time(BLOWS)[0][at]
    stroke, accent_db = np.transpose(ACCENTS)
    force_db[stroke.astype(int) - 1] += accent_db
    skid_db = -15 * (t > 2.972) * (t < 3.01)
    bit_db = force_db + 0.5 * luck[:, 2] + skid_db
    thud_db = bit_db - 7 - 4 * (t < 3.17) - 3.5 * (t > 5.16)
    out = steel(at, luck, bit_db) + concrete(at, luck, thud_db)
    out = np.array([rack_gain(-.9) * out[0], rack_gain(.9) * np.roll(out[1], 1)])
    return out + rack_gain(-12.5) * np.roll(out[::-1], 150, axis=1)


def scene():
    return outdoors() + clinks() + rubble() + gear_noises() + puffs() + motor() + hammer()


def band_limit(x):
    return signal.sosfilt(signal.butter(12, 15780, fs=SR, output="sos"), x)


def record(dry):
    ported = shaped(dry, lambda hz: rack_gain(peaks(PORT_COLOUR, hz)))
    rounded = .97 * np.tanh(ported / .97)
    cut = signal.sosfilt(signal.ellip(10, .5, 70, 15600, fs=SR, output="sos"), rounded)
    mix = filtered(cut, 2, 42, "high")
    return band_limit(mix)


dry = scene()
out = record(dry)
transcribe(out)
```